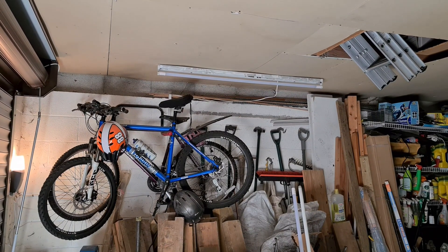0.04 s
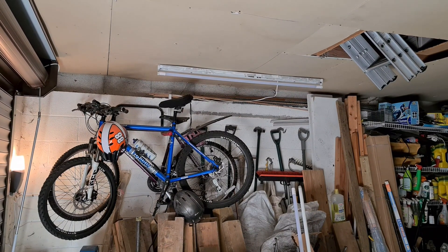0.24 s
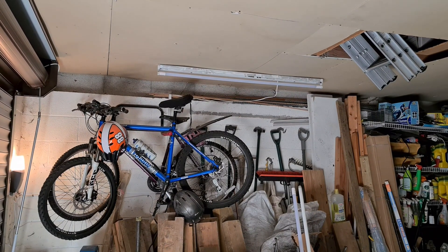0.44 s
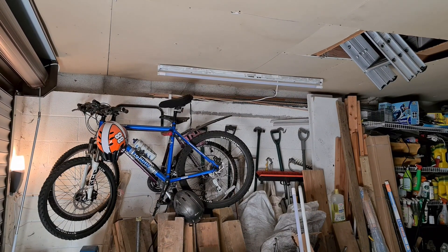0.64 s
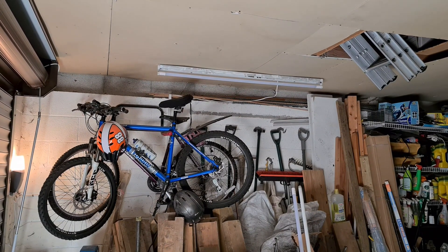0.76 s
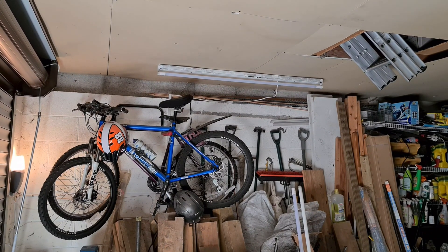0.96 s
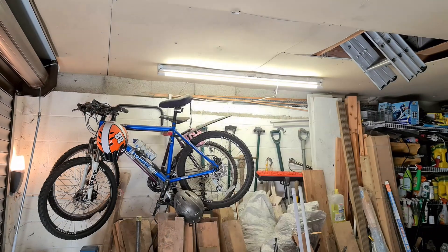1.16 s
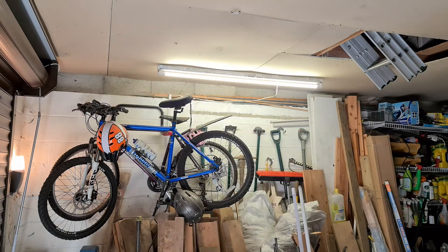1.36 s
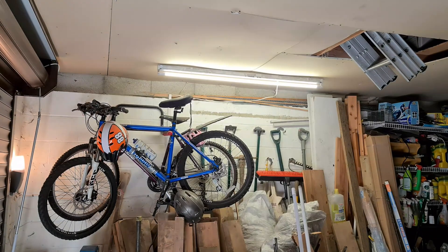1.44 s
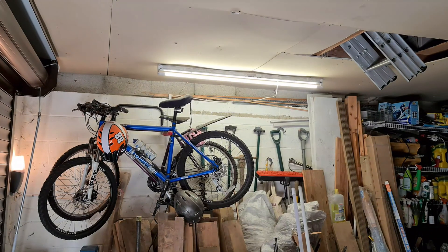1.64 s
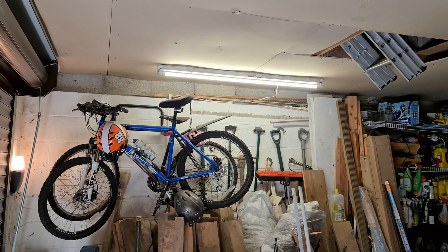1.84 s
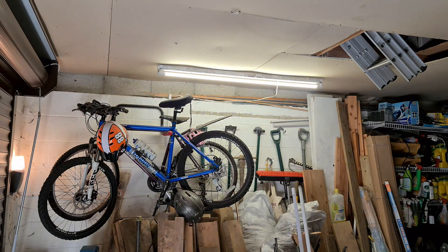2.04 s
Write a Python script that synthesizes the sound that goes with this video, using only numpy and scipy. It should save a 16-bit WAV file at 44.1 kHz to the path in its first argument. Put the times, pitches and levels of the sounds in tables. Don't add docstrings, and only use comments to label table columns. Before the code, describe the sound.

A single wall light switch click at about 1.14 s: a tiny scrape and lead-in tick, a hard bright plastic snap, quick rebounds within several milliseconds, a slight hollow box hum, and a dense garage tail gone in about 0.2 s. Before it, a faint tick at 0 s, soft sleeve rustle near 0.2 s, and a low wavering car drone outside, fading through 2 s over faint hiss.

```python
import sys
import numpy as np
from scipy import signal
from scipy.fft import rfft, irfft, next_fast_len
from scipy.io import wavfile
from scipy.ndimage import uniform_filter1d, map_coordinates

SR = 44100
rng = np.random.default_rng(int(sys.argv[2]) if len(sys.argv) > 2 else 0)


def natural_amplitude(level_db):
    exponent = np.asarray(level_db, float) / 20
    return 10 ** exponent


def dump_mix(stems):
    frames = np.atleast_2d(stems).T
    limited = np.clip(frames, -1, 1)
    pcm = np.round(limited * 32767).astype(np.int16)
    wavfile.write(sys.argv[1], SR, pcm)


N = 92345
TIME = np.arange(N) / SR

# (time [s], peak level [dB], left-right balance [dB], brightness [dB per octave])
CONTACTS = [
    (1.1401, -24, -5, -2),
    (1.14155, -6, -2, -2.5),
    (1.1433, -12, 4, 3),
    (1.1443, -10.5, -2, -.5),
    (1.146, -15, 0, -.3),
    (1.1478, -17, 1.2, -.3),
]
# (time [s], tyre roar level [dB], body rumble level [dB])
CAR = [(0, -62, -48), (.33, -61.5, -54.5), (.69, -62, -53), (.82, -61.5, -55), (.9, -64, -51.5),
       (.99, -65, -59), (1.07, -66, -53.5), (1.23, -68, -59.5), (1.6, -69, -61), (1.88, -66, -60.5),
       (1.97, -68, -58.5), (2.09, -67, -60)]
# (frequency [Hz], correlation [-1..1])
ALIKE = [(60, 0.97), (180, 0.92), (550, 0.54), (1650, -0.33), (4970, 0.21), (15000, 0.47)]


def unit(x):
    return x / np.sqrt(np.mean(x ** 2) + 1e-20)


def along(points, hz):
    f, v = np.transpose(points)
    return np.interp(np.log(hz + 1), np.log(f + 1), v)


def curve(rows):
    s, *columns = np.transpose(rows)
    return [np.interp(TIME, s, column) for column in columns]


def wobble(rate):
    knots = rng.standard_normal(int(N * rate / SR) + 4)
    return map_coordinates(knots, [np.arange(N) * rate / SR])


def filtered(x, response):
    m = next_fast_len(N + 8192)
    return irfft(rfft(x, m) * response(np.fft.rfftfreq(m, 1 / SR)), m)[..., :N]


def shaped(points, lifts=()):
    def gain(hz):
        bumps = sum(db / (1 + (2 * (hz - centre) / width) ** 2) for centre, width, db in lifts)
        inside = (hz > points[0][0] / 2) * (hz < points[-1][0] * 2)
        return natural_amplitude(along(points, hz) + bumps) * inside
    return gain


def rush(gain, alike, patchy_db):
    z = signal.stft(rng.standard_normal((2, N)), nperseg=512)[2]
    field = uniform_filter1d(rng.standard_normal(z.shape[1:]), size=5, axis=0)
    field = uniform_filter1d(field, size=10, axis=1)
    pair = signal.istft(z * natural_amplitude(patchy_db * unit(field)), nperseg=512)[1][:, :N]

    def mid_side_gain(hz):
        turn = np.arccos(np.clip(along(alike, hz), -1, 1)) / 2
        return gain(hz) * [np.cos(turn), np.sin(turn)]

    mid, side = filtered(pair, mid_side_gain)
    return unit(np.array([mid + side, mid - side]))


def microphone_hiss():
    # (frequency [Hz], level [dB per Hz])
    hiss_colour = [(2400, -7), (4500, -0.5), (6500, -9), (8000, -8.5), (8860, -1.5), (10000, -5),
                   (11600, -3.5), (15800, -10)]
    hiss_db, follows = -82, 0.36
    street_db = curve(CAR)[0]
    level_db = hiss_db + follows * (street_db - street_db.mean())
    return natural_amplitude(level_db) * rush(shaped(hiss_colour), ALIKE, patchy_db=1.58)


def opening_tick():
    start_db, t60_s, corner_hz = -50, .004, 2630
    noise = filtered(rng.standard_normal(N), lambda hz: 2 / (1 + hz / corner_hz))
    return natural_amplitude(start_db - 60 * TIME / t60_s) * noise


def traffic():
    # (time [s], level [dB])
    drone_level = [(0.0, -49.5), (0.04, -48), (0.07, -50.5), (0.21, -70), (0.28, -45), (0.37, -63),
                   (0.42, -47), (0.71, -51.5), (0.74, -73), (0.96, -52), (1.01, -70.5), (1.22, -55.5),
                   (1.28, -60.5), (1.61, -63), (1.96, -64.5), (2.09, -74.5)]
    # (frequency [Hz], level [dB per Hz])
    tyre_colour = [(250, -19), (370, -8), (420, -2), (600, -6), (1000, 0), (1300, -7.5), (2000, -16),
                   (4500, -39.5)]
    # (frequency [Hz], level [dB per Hz])
    rumble_colour = [(20, -11), (33, 2.5), (48, -8.5), (100, -2), (125, -5.5), (180, -0.5), (260, -10),
                     (500, -38.5)]
    # (frequency [Hz], width [Hz], lift [dB])
    hollow = [(100, 14, 6.5), (159, 4.7, 6), (203, 14, 2.5), (440, 17, 2), (887, 60, 2.5)]
    rumble_gain_db, roar_gain_db = 1.5, 3.5
    drone_hz, wander_hz = 62.2, 4
    roar_db, rumble_db = curve(CAR)
    tyres = natural_amplitude(roar_db + roar_gain_db + 1.2 * wobble(5.3))
    tyres = tyres * rush(shaped(tyre_colour, hollow), ALIKE, patchy_db=2.0)
    rumble = natural_amplitude(rumble_db + rumble_gain_db + wobble(7))
    rumble = rumble * rush(shaped(rumble_colour, hollow), ALIKE, patchy_db=2.5)
    pitch_hz = drone_hz + wander_hz * wobble(9)
    drone = unit(np.sin(2 * np.pi * np.cumsum(pitch_hz) / SR))
    drone = natural_amplitude(curve(drone_level)[0] + 2.3 * wobble(14)) * drone
    return (tyres + rumble + drone) * natural_amplitude([[-.3], [.3]])


def sleeve():
    # (time of peak [s], rise [s], level [dB])
    strokes = [
        (.15, 0.032, -77.5),
        (0.204, 0.021, -70.5),
        (.25, 0.022, -87),
    ]
    # (frequency [Hz], level [dB per Hz])
    cloth = [(1500, -21), (2500, -12), (3300, 6.5), (4800, -4), (6000, -11.5), (15000, -12)]
    t60_s = 0.29
    shape = 0
    for s, rise, db in strokes:
        decay = natural_amplitude(db - 60 * np.maximum(TIME - s, 0) / t60_s)
        shape = shape + decay * np.clip((TIME - s) / rise + 1, 0, 1)
    return shape * rush(shaped(cloth), [(3000, 0.15)], patchy_db=2)


def garage():
    # (frequency [Hz], t60 [s])
    room_t60 = [(400, 0.16), (1000, .17), (2500, .27), (6000, .26), (12000, .22), (15000, .17)]
    # (frequency [Hz], level [dB per Hz])
    walls = [(180, -62), (300, -32.5), (439, -24), (493, -33), (896, -14.5), (1990, -16.5), (2470, -3.5),
             (11500, -13.5), (15800, -20.5)]
    tail_db, start_s, rise_s, hold_s = -28.5, 1.1445, 0.001, 0.027
    bend_db = 903
    noise = rush(shaped(walls), [(500, .5), (3000, 0)], patchy_db=1.6)
    hz, t, z = signal.stft(noise, SR, nperseg=256)
    late = np.maximum(t - start_s - hold_s, 0)
    decay_db = -60 * late / along(room_t60, hz)[:, None] - bend_db * late ** 2
    tail = signal.istft(z * natural_amplitude(decay_db), SR, nperseg=256)[1][:, :N]
    since = np.maximum(TIME - start_s, 0)
    return natural_amplitude(tail_db) * tail * (1 - np.exp(-since / rise_s))


def swell_before_snap():
    # (frequency [Hz], level [dB per Hz])
    swell_colour = [(1000, -13.5), (2500, 2), (6000, -7), (9700, -4), (12000, -16), (15800, -24.5)]
    peak_s, peak_db, slope_db_per_s = 1.139, -44.5, 1250
    level_db = peak_db - slope_db_per_s * np.abs(peak_s - TIME)
    return natural_amplitude(level_db) * rush(shaped(swell_colour), [(3000, 0.13)], patchy_db=-0.5)


def box():
    # (frequency [Hz], level [dB], t60 [s])
    box_modes = [(447.5, -37, .06), (702.3, -39, 0.085), (809.3, -33.5, .07), (1105, -41, 0.013)]
    rise_s = .002
    t = np.maximum(TIME - CONTACTS[1][0], 0)
    skew = np.array([[.5], [-.5]])
    hum = 0
    for hz, db, t60 in box_modes:
        hum = hum + natural_amplitude(db - 60 * t / t60) * np.sin(2 * np.pi * hz * t + skew * hz / 700)
    return hum * (1 - np.exp(-t / rise_s))


def switch():
    # (frequency [Hz], level [dB], t60 [s])
    plate = [(1400, -17, 0.023), (1950, -14, 0.0096), (2395, -12, 0.016), (2750, -2, .012), (3500, -5, .01),
             (3945, -5, 0.0083), (4720, -0.5, 0.0083), (5740, -6.5, 0.0098), (7700, -10, 0.013),
             (9640, -7, 0.0053), (11164, -7.5, 0.007), (12115, -2.5, .008), (14300, -16.5, 0.005)]
    crack_db, crack_t60, scatter_db = 1.5, 0.0054, 3.5
    plate_low_hz = 420
    out, t = np.zeros((2, N)), np.arange(SR // 20) / SR
    hz, level_db, t60 = np.transpose(plate)[:, :, None]
    soft = 1 - np.exp(-t / .0001)
    for s, db, pan_db, tilt_db in CONTACTS:
        level_chance, phase_chance = rng.standard_normal((2, 2, len(plate), 1))
        tilt = tilt_db * np.log2(np.maximum(hz / 3000, 1))
        mode_db = level_db + tilt + scatter_db * level_chance - 60 * t / t60
        ring = natural_amplitude(mode_db) * np.sin(2 * np.pi * hz * t + 1.3 * phase_chance)
        crack = natural_amplitude(crack_db + 2 * tilt_db - 60 * t / crack_t60) * rng.standard_normal((2, len(t)))
        side_db = db - 8 + np.array([[.5], [-.5]]) * pan_db
        out[:, round(s * SR):][:, :len(t)] += natural_amplitude(side_db) * soft * (ring.sum(axis=1) + crack)
    return signal.sosfilt(signal.butter(3, plate_low_hz, 'high', fs=SR, output='sos'), out)


def scene():
    return switch() + box() + swell_before_snap() + garage() + traffic() + sleeve()


def roll_off(x):
    return signal.sosfilt(signal.butter(12, 16040, fs=SR, output="sos"), x)


def record(dry):
    top_hz, edge_hz = 15900, 140

    def band_limit(hz):
        return .5 - .5 * np.tanh((hz - top_hz) / edge_hz)

    mix = filtered(dry + microphone_hiss(), band_limit) + opening_tick()
    return roll_off(mix)


dry = scene()
out = record(dry)
dump_mix(out)
```